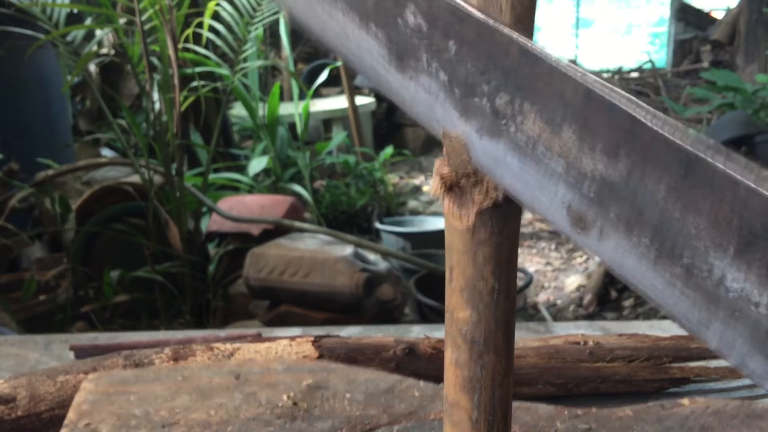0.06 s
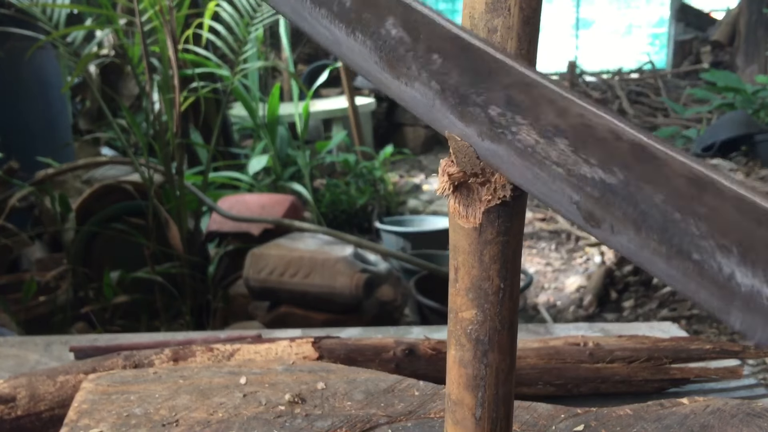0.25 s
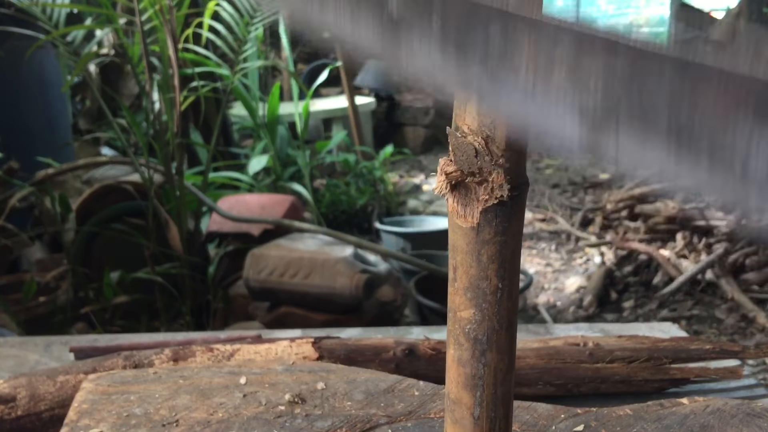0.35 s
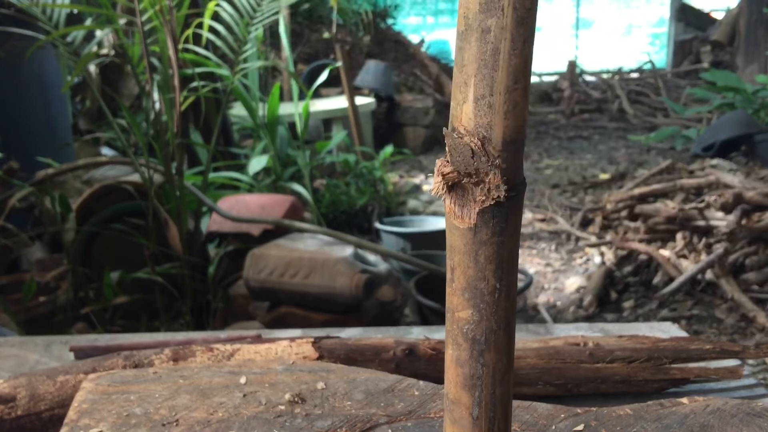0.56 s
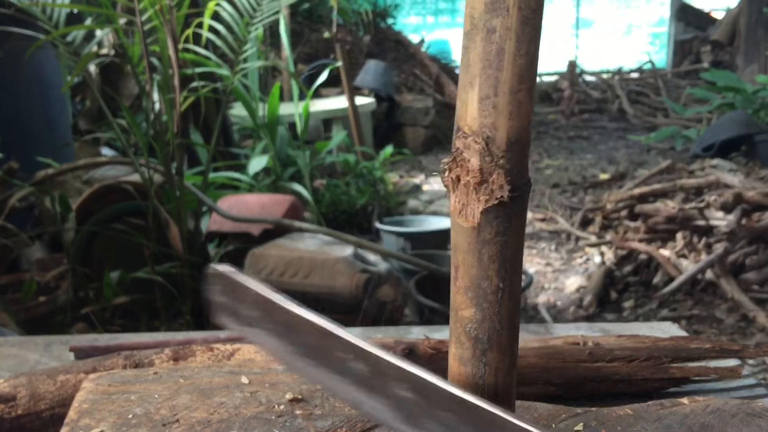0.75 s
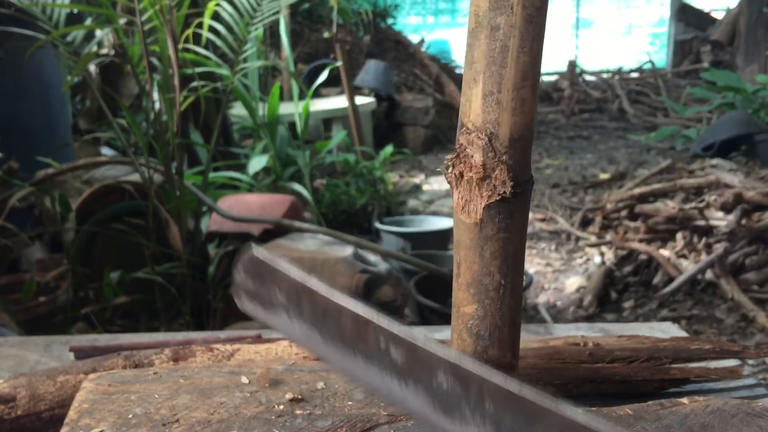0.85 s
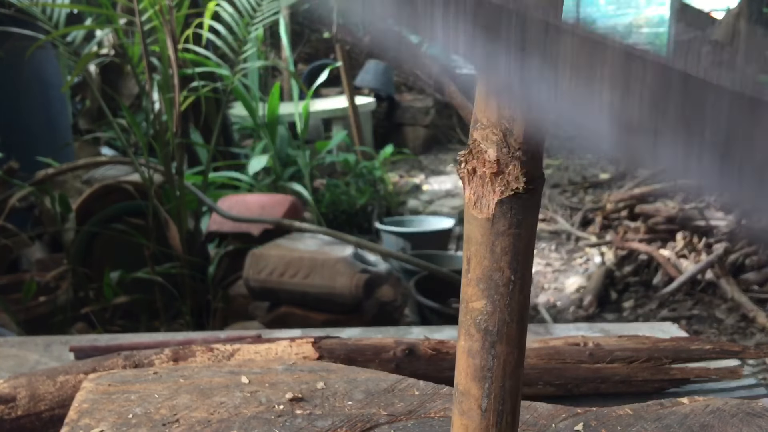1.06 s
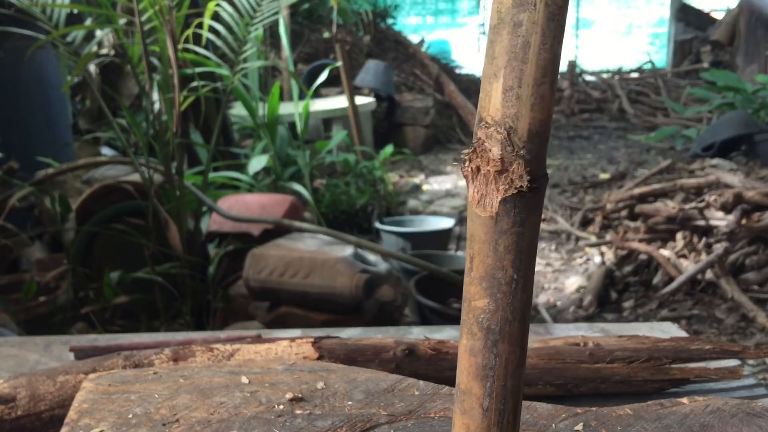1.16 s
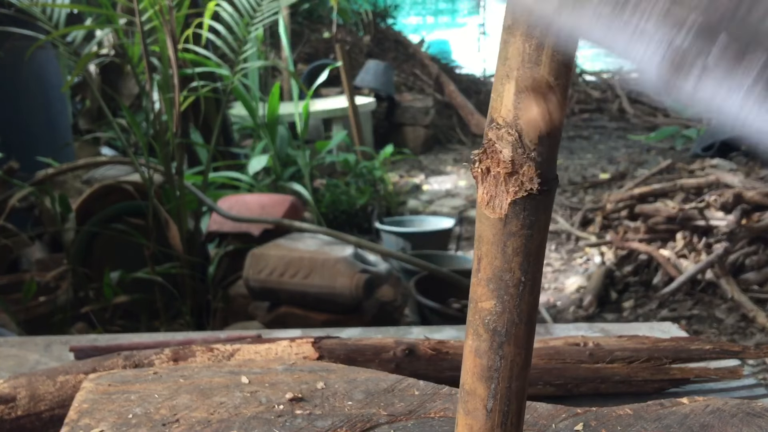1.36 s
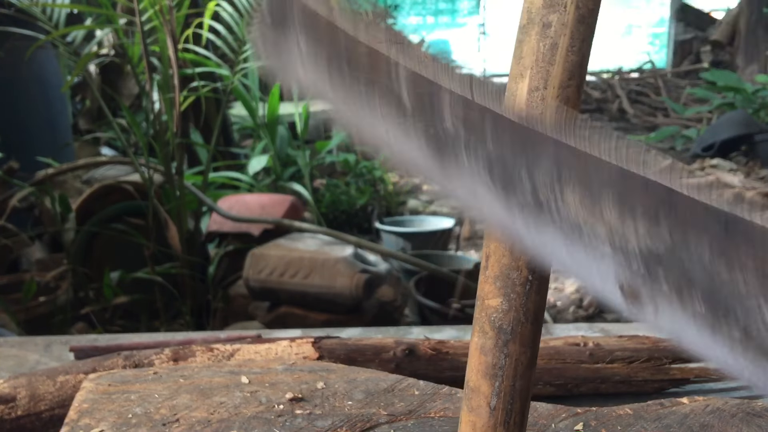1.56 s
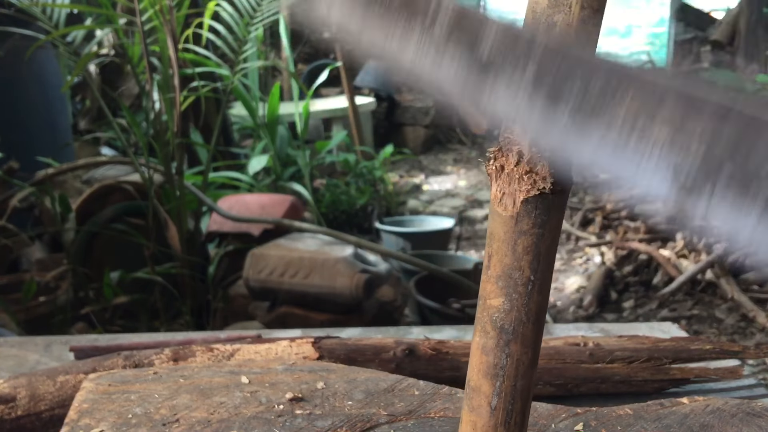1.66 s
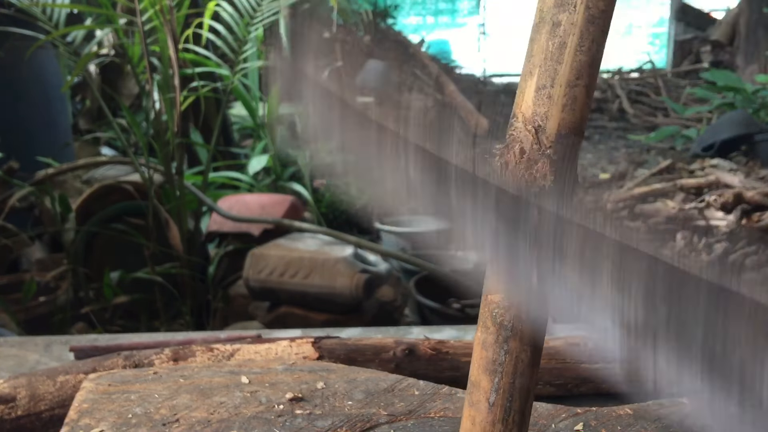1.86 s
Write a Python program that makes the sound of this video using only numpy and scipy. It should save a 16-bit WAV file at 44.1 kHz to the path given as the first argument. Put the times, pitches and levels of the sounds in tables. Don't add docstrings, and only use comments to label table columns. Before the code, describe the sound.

Two loud, cracking blade chops on bamboo up close, followed by steel scraping and small wooden knocks

```python
import sys
import numpy as np
from scipy import signal
from scipy.fft import rfft, irfft
from scipy.io import wavfile
from scipy.ndimage import uniform_filter1d

SR = 44100
rng = np.random.default_rng(int(sys.argv[2]) if len(sys.argv) > 2 else 0)


def generate_wav(signal):
    frames = np.transpose(np.atleast_2d(signal))
    scaled = np.clip(frames, -1, 1) * 32767
    pcm = np.round(scaled).astype(np.int16)
    wavfile.write(sys.argv[1], SR, pcm)


def boost(x):
    u = np.asarray(x, float) / 20
    return 10 ** u


N = 83790
T = np.arange(N) / SR

# frequency in Hz, level in dB per Hz.
AIR_SPECTRUM = [(15, -58.5), (40, -21.5), (102, -14), (451, -10), (677, -6.5), (1480, -16), (1740, -7.5),
                (3430, -33.5), (16000, -40)]
# time in seconds, level in dB.
TRAFFIC_SWELL = [(0, 5), (.4, 6), (.5, 0), (.56, 7), (1.0, 6), (1.2, 6), (1.9, 8)]
AIR_DB, SWELL_DB, FLICKER_DB = -62.5, 1, 2
HUM_HZ, HUM_WIDTH_HZ, HUM_DB = 98, 22, -59

# centre in Hz, level in dB, t60 in seconds.
YARD_BANDS = [(157, -6.5, 0.48), (605, -4, 0.35), (1500, 6, 0.26), (3500, -3.5, 0.35), (7000, 1, 0.12),
              (13000, -9, 0.1)]
YARD_DB, YARD_BUILDUP_S = -18, 0.023

POLE_HZ = [385, 528, 575, 650, 722, 850, 921, 992, 1143, 1570, 1950]
# strength in dB, t60 in seconds.
POLE_CHOP_1 = [(-17.5, 0.065), (-1, 0.02), (-4, 0.033), (-1, 0.057), (-3, 0.045), (-8.5, .05), (-7, 0.031),
               (0.5, 0.043), (-7, 0.025), (-13.5, 0.037), (-15.5, 0.035)]
# strength in dB, t60 in seconds.
POLE_CHOP_2 = [(-16, 0.14), (2.5, 0.046), (-6.5, 0.06), (-1.5, 0.088), (-1.5, 0.048), (-11.5, .08),
               (-2.5, 0.034), (-3.5, 0.052), (-9.5, 0.024), (-13.5, 0.05), (-17.5, 0.056)]
# pitch in Hz, strength in dB, t60 in seconds.
POLE_SWAY = [(95.26, -15, 0.12), (242, -23.5, 0.017), (589, 1, 0.024)]
WALL_HIGHPASS_HZ, RADIATES_ABOVE_HZ = 455, 141

STUCK_HZ = [
    (2719, 3990, 4780, 5346, 6767, 7660, 9260, 10060, 12420),
    (1775, 4610, 5175, 6455, 7640, 9200, 10680, 12300, 14160),
]
# strength in dB, t60 in seconds.
BLADE_CUT_1 = [(-13.5, 0.045), (-10.5, 0.042), (-20, .04), (-16.5, 0.23), (-3.5, 0.098), (-11, 0.097),
               (-3.5, 0.062), (-18, 0.069), (-25.5, .06)]
# strength in dB, t60 in seconds.
BLADE_CUT_2 = [(-1.5, 0.09), (-4, 0.02), (0.5, 0.068), (-7, .05), (-10.5, 0.068), (-2, .06), (-2, .035),
               (-5, 0.048), (-24.5, .05)]
FREE_HZ = [1850, 2930, 3710, 4620, 5200, 6360, 6860, 7710, 8720, 9220, 10720, 12350, 14030, 15700]
# strength dragged down in dB, strength drawn back in dB, t60 in seconds.
FREE_MODES = [(-3.5, -3, 0.04), (-9.5, -5, 0.054), (0, -3, 0.027), (2.5, -2, 0.064), (-3.5, -5, 0.08),
              (-6.5, -21, .035), (-12.5, -13, 0.044), (-2, -6, .045), (-6.5, -10.5, .035),
              (-1, -4.5, 0.081), (0.5, -4.5, 0.046), (-4.5, -7, 0.07), (2, 0, 0.069), (-10, -7, .05)]
TURN_S, WANDER_DB = 1.65, 3

# start in seconds, hold in seconds, t60 in seconds, level in dB, pitch in Hz.
RUBS = [(0.147, 0.009, 0.23, -27, 178), (.145, 0.0085, 0.27, -39, 50), (.15, 0.011, 0.31, -27, 707),
        (0.74, 0.0068, 0.28, -33, 190), (.742, .01, 0.12, -30, 50.6), (.748, 0.008, .25, -27.5, 963),
        (0.883, 0.066, 0.56, -56, 4400), (.89, 0.033, .15, -58, 5600), (1.45, 0.033, 0.034, -44.5, 2000),
        (1.618, 0.043, 0.17, -46, 68), (1.76, 0.012, 0.039, -41, 2000), (1.74, 0.005, .02, -49, 12250),
        (1.664, 0.0062, 0.053, -35, 1920)]
RUB_Q, RUB_GRAIN_DB = 3.2, 2

# start in seconds, pitch in Hz, level in dB.
PINGS = [(1.133, 3200, -51), (1.368, 4634, -31.5), (1.408, 10660, -39), (1.409, 4620, -40),
         (1.458, 10720, -40), (1.589, 12350, -30), (1.611, 10720, -23), (1.611, 9900, -25),
         (1.658, 9220, -33), (1.663, 6280, -33), (1.663, 4620, -37), (1.711, 6360, -33), (1.711, 9220, -37),
         (1.782, 14030, -40), (1.781, 6360, -41), (1.797, 14030, -31), (1.799, 4620, -37)]
PING_T60_S = 0.085

# start in seconds,
# level in dB, pitch in Hz.
TICKS = [(.374, -40, 2860), (.7135, -33, 6120), (.7255, -37, 8030), (.7305, -37, 9070), (.8215, -24, 6030),
         (.8768, -31.5, 7500), (.822, -28, 3500), (1.6625, -16, 5100), (1.855, -39, 9000),
         (.4205, -49, 5000), (.882, -51, 11290), (.951, -64.5, 14820), (.960, -45, 15270),
         (1.007, -44, 8450), (1.059, -56.5, 12100), (1.071, -48.5, 7000), (1.128, -37, 8070),
         (1.133, -27, 3370)]
# start in seconds, level in dB, pitch in Hz.
GRAZES = [(.113, -41.5, 7000), (.1155, -28.5, 5500), (.125, -47.5, 8050), (.1275, -40, 7000),
          (.283, -60, 10930), (.296, -41.5, 10900), (.314, -46, 11040), (.336, -55, 13000),
          (.357, -46.5, 9910)]
# start in seconds, level in dB.
NUDGES = [(.116, -29.5), (.129, -33), (0.376, -41), (.715, -34.5), (1.099, -54)]
# pitch in Hz, strength in dB, t60 in seconds.
CHIP_MODES = [(2000, -11.5, 0.02), (4110, -7.5, 0.0079), (4500, 2, 0.003), (5600, -5, 0.0084),
              (7420, -14.5, 0.0023)]
TICK_T60_S, TICK_Q, GRAZE_RING_DB = 0.0048, 0.94, -31
RUSTLE_DB, RUSTLE_T60_S = -26, 0.29
CHIP_S, CHIP_DB = 0.8765, -31.5

# start in seconds, scratch in dB, scratch length in seconds, wood in dB, wood pitch in Hz.
KNOCKS = [(1.365, -41, 0.009, -45, 1500), (1.407, -45, 0.0072, -54, 1500),
          (1.457, -45, 0.0024, -26.5, 1800), (1.605, -12, .0065, -18, 344), (1.618, -28, .005, -38, 600),
          (1.658, -39, 0.0032, -42, 2040), (1.663, -39.5, 0.0032, -22, 1500),
          (1.71, -36.5, 0.0014, -67, 2430), (1.756, -49.5, 0.0017, -35.5, 1800),
          (1.78, -42, 0.00099, -60, 2000), (1.796, -43.5, 0.0027, -34.5, 1900)]
# pitch in Hz, strength in dB, t60 in seconds.
NOTCH_MODES = [(253, 8.5, 0.017), (576, 10, 0.026), (786, 12, 0.013), (1320, 0.5, 0.034),
               (1800, -19.5, 0.17), (1886, 6.5, 0.023), (2194, -11.5, 0.12), (2760, -11, 0.007)]
# frequency in Hz, level in dB per Hz.
SCRATCH_SPECTRUM = [(300, -14), (700, -14.5), (2000, -12), (4500, -7), (8000, 4), (12000, 1), (16000, -3.5)]
KNOCK_RING_DB, KNOCK_T60_S = -14, 0.034
WOOD_T60_S, WOOD_NOISE_DB, FOCUS_DB_PER_OCT = 0.036, 2, 7

# time in seconds, level in dB.
DRAG_PRESSURE = [(1.361, -64), (1.379, -41.5), (1.399, -63), (1.453, -73), (1.459, -45.5), (1.52, -48),
                 (1.533, -54), (1.56, -38), (1.595, -38), (1.63, -69), (1.685, -55.5), (1.72, -50),
                 (1.775, -51.5), (1.793, -52), (1.802, -39), (1.856, -54.5), (1.885, -40.5), (1.9, -35.5)]
# frequency in Hz, level in dB per Hz.
RASP_SPECTRUM = [(400, -18.5), (2000, -11.5), (4500, 0), (8000, 0.5), (10000, -8.5), (12500, -5),
                 (14900, -17), (16000, -10)]
RASP_RING_DB, SLIPS_PER_S, GRIT_DB, PATCHY_DB = 8.5, 5000, 2, 4

# start in seconds, crack in dB, cutting time in seconds, thump in dB, ring in dB.
CHOPS = [
    (0.1366, -2.5, .0036, 12, -18.5),
    (.7322, -8.5, 0.0056, 10.5, -12),
]
# frequency in Hz, level in dB.
CRACK_SPECTRUM = [(300, -31), (1200, -4), (2500, -5), (5000, -2.5), (9500, -5.5), (12500, -11),
                  (17000, -14)]
SHUDDER_DB = (-45, -56.5)
CRACK_T60_S, SPLINTER_DB, SPLINTER_T60_S = 0.021, -26, 0.12
PUSH_S, SCATTER_S, SCATTER_DB = 0.00056, 0.072, -10
SHUDDER_T60_S = 0.28
CLIP = 1.0


def unit(x):
    return x / np.sqrt(np.mean(x ** 2))


def colour(x, points):
    hz, db = np.array(points).T[:2]
    grid_hz = np.arange(1, 1026) * SR / 2048
    log_gain = np.interp(np.log(grid_hz), np.log(hz), db) * np.log(10) / 20
    cepstrum = irfft(log_gain)
    cepstrum[1:1024] *= 2
    cepstrum[1025:] = 0
    return signal.fftconvolve(x, irfft(np.exp(rfft(cepstrum))))[:len(x)]


def mode(x, hz, t60):
    r = np.exp(-np.log(1000) / (max(t60, 0.002) * SR))
    w = 2 * np.pi * hz / SR
    return signal.lfilter([0, r * np.sin(w)], [1, -2 * r * np.cos(w), r * r], x)


def ring(x, modes):
    return sum(boost(db) * mode(x, hz, t60) for hz, db, t60 in modes)


def band(x, hz, q):
    return signal.lfilter(*signal.iirpeak(min(hz, 0.4 * SR), q, SR), x)


def band_twice(x, hz, q):
    return band(band(x, hz, q), hz, q)


def high_pass(x, order, hz):
    return signal.lfilter(*signal.butter(order, hz, "high", fs=SR), x)


def burst(start, hold, t60):
    attack = np.clip((T - start) / 0.0003, 0, 1)
    return attack * boost(-60 * np.clip(T - start - hold, 0, 1) / t60)


def push(start, length):
    return np.sin(np.pi * np.clip((T - start) / length, 0, 1)) * np.pi / (2 * length * SR)


def walk(rate):
    k = int(SR / rate)
    steps = np.repeat(rng.standard_normal(N // k + 1), k)
    return unit(uniform_filter1d(steps, k)[:N])


def air():
    hz, db = np.array(AIR_SPECTRUM).T
    out, swell = 0, walk(1.1)
    for centre in 30 * 2 ** np.arange(0, 9.1, 0.5):
        level_db = np.interp(np.log(centre), np.log(hz), db) + 10 * np.log10(centre)
        level_db = level_db + SWELL_DB * swell + FLICKER_DB * walk(20)
        out = out + boost(level_db) * unit(band_twice(rng.standard_normal(N), centre, 2))
    hum = unit(mode(rng.standard_normal(N), HUM_HZ, 2 / HUM_WIDTH_HZ))
    traffic_db = np.interp(T, *np.array(TRAFFIC_SWELL).T)
    return boost(AIR_DB + traffic_db) * unit(out) + boost(HUM_DB) * hum


def yard(x):
    t = T[:SR // 2]
    tail = 0
    for hz, db, t60 in YARD_BANDS:
        noise = unit(band_twice(rng.standard_normal(len(t)), hz, 0.75))
        tail = tail + boost(db - 60 * t / t60) * noise
    tail = tail * np.clip(t / YARD_BUILDUP_S, 0, 1)
    return boost(YARD_DB - 38.5) * signal.fftconvolve(x, tail)[:N]


def rubs():
    grainy = rng.standard_normal(N) * boost(RUB_GRAIN_DB * walk(250))
    out = 0
    for s, hold, t60, db, hz in RUBS:
        out = out + boost(db) * unit(band_twice(grainy, hz, RUB_Q)) * burst(s, hold, t60)
    return out


def pole(x, k):
    rows = (POLE_CHOP_1, POLE_CHOP_2)[k]
    wall = ring(x, [(hz, *row) for hz, row in zip(POLE_HZ, rows)])
    return high_pass(wall, 3, WALL_HIGHPASS_HZ) + ring(x, POLE_SWAY)


def stuck_blade(x, k):
    rows = (BLADE_CUT_1, BLADE_CUT_2)[k]
    return ring(x, [(hz, *row) for hz, row in zip(STUCK_HZ[k], rows)])


def free_blade(x):
    back = np.clip((T - TURN_S) / 0.02, 0, 1)
    out = 0
    for hz, (down_db, back_db, t60) in zip(FREE_HZ, FREE_MODES):
        feed_db = down_db + (back_db - down_db) * back + WANDER_DB * walk(60)
        out = out + mode(x * boost(feed_db), hz, t60)
    return out


def ticks():
    noise = rng.standard_normal(N)

    def clicks(rows):
        out = 0
        for s, db, hz in rows:
            shape = burst(s, 0.0001, TICK_T60_S) + boost(RUSTLE_DB) * burst(s, 0, RUSTLE_T60_S)
            out = out + band_twice(boost(db) * noise * shape, hz, TICK_Q)
        return out

    graze = clicks(GRAZES)
    graze_ring = boost(GRAZE_RING_DB) * stuck_blade(graze, 0)
    nudge = sum(boost(db - 6) * push(s, PUSH_S) for s, db in NUDGES)
    landing = band(noise * burst(CHIP_S, 0.0015, 0.005), 5000, 0.58)
    chip = boost(CHIP_DB) * ring(landing, CHIP_MODES)
    return chip + clicks(TICKS) + graze + graze_ring + pole(nudge, 0)


def pings():
    return sum(boost(db) * mode(push(s, 0.5 / hz), hz, PING_T60_S) for s, hz, db in PINGS)


def knocks():
    noise, scratch, wood = rng.standard_normal((2, N)), 0, 0
    for s, scratch_db, length, wood_db, hz in KNOCKS:
        scratch = scratch + boost(scratch_db) * burst(s, length, KNOCK_T60_S)
        near = [(f, db - FOCUS_DB_PER_OCT * abs(np.log2(f / hz)), t60) for f, db, t60 in NOTCH_MODES]
        crumble = band_twice(noise[1] * burst(s, length, WOOD_T60_S), max(hz, 900), 0.29)
        tap = high_pass(push(s + length / 3, 0.206 / hz), 2, hz / 2)
        wood = wood + boost(wood_db) * (ring(tap, near) + boost(WOOD_NOISE_DB) * crumble)
    steel = boost(KNOCK_RING_DB - 32.5) * free_blade(noise[0] * scratch)
    return unit(colour(noise[0], SCRATCH_SPECTRUM)) * scratch + steel + wood


def rasp():
    s, db = np.array(DRAG_PRESSURE).T
    chance = rng.random((3, N))
    sign = np.sign(chance[1] - 0.5)
    slips = (chance[0] < SLIPS_PER_S / SR) * sign * boost(-GRIT_DB * np.log(chance[2] + 0.02))
    press = boost(np.interp(T, s, db, left=-120) + 0.63 * walk(90))
    steel = free_blade(slips * press) / np.std(free_blade(slips))
    patchy = 0
    for hz in 400 * 1.2 ** np.arange(21):
        patchy = patchy + band(slips, hz, 5) * boost(PATCHY_DB * walk(45))
    scrape = unit(colour(patchy, RASP_SPECTRUM)) * press
    return (scrape + boost(RASP_RING_DB) * steel) / np.sqrt(2)


def chops():
    out = 0
    for k, (s, crack_db, cut, thump_db, ring_db) in enumerate(CHOPS):
        noise = rng.standard_normal((3, N))
        stop = s + cut
        split = burst(s, cut, CRACK_T60_S) + boost(SPLINTER_DB) * burst(s, cut, SPLINTER_T60_S)
        crack = unit(colour(noise[0], CRACK_SPECTRUM)) * split
        scatter = boost(SCATTER_DB - 20.5) * noise[1] * burst(stop, 0, SCATTER_S)
        force = push(stop, PUSH_S) + scatter
        click = np.diff(np.clip((T - stop) * SR, 0, 1), prepend=0)
        shudder = boost(SHUDDER_DB[k]) * noise[2] * burst(stop, 0, SHUDDER_T60_S)
        out = out + boost(crack_db) * crack
        out = out + boost(thump_db - 11.5) * pole(force, k)
        out = out + boost(ring_db) * stuck_blade(click + shudder, k)
    return out


def scene():
    near = chops() + ticks() + knocks() + rasp() + pings()
    near = high_pass(near, 2, RADIATES_ABOVE_HZ)
    return (near + yard(near) + rubs() + air())[None]


def low_pass(x):
    return signal.sosfilt(signal.butter(12, 15900, fs=SR, output="sos"), x)


def record(dry):
    return low_pass(np.clip(dry, -CLIP, CLIP))


dry = scene()
out = record(dry)
generate_wav(out)
```